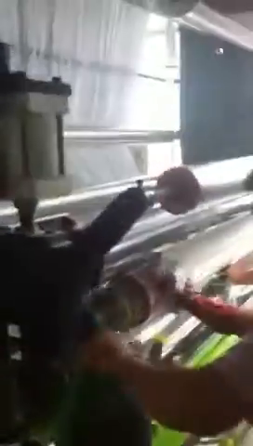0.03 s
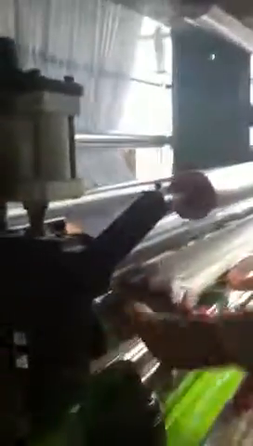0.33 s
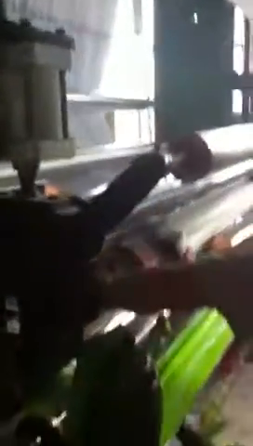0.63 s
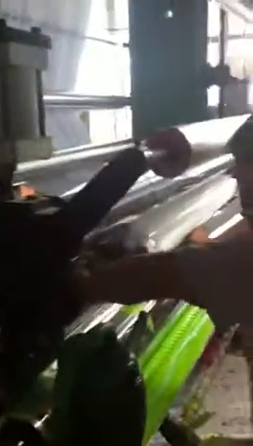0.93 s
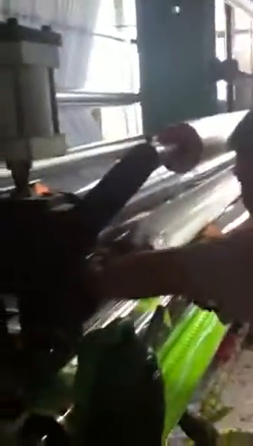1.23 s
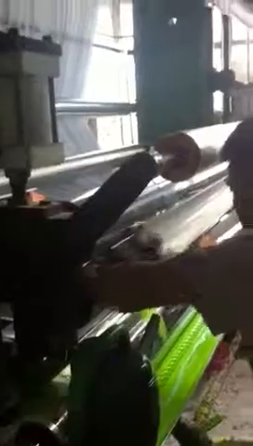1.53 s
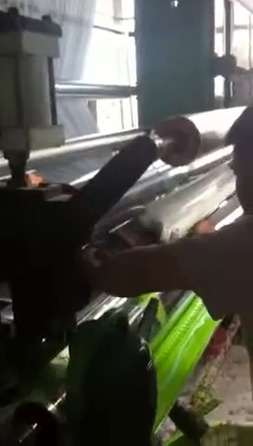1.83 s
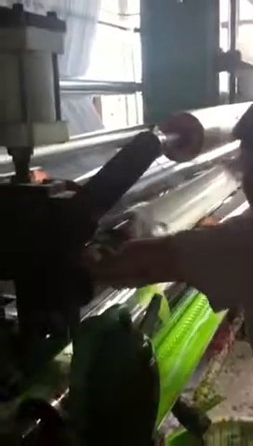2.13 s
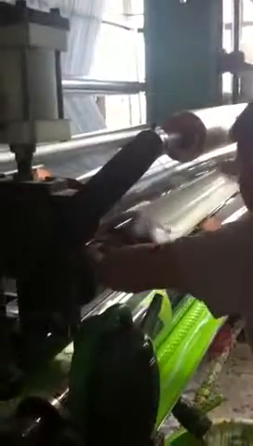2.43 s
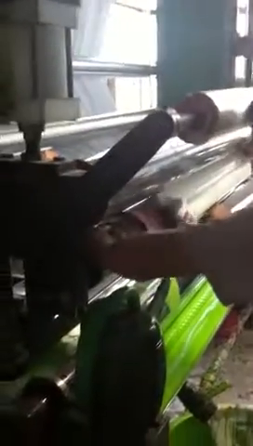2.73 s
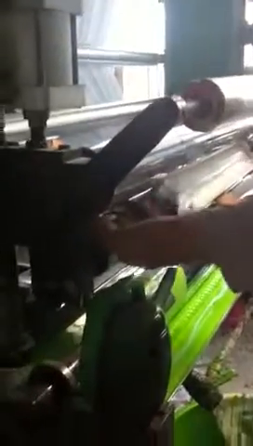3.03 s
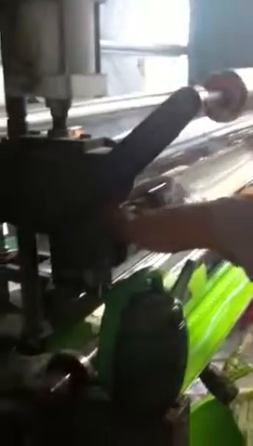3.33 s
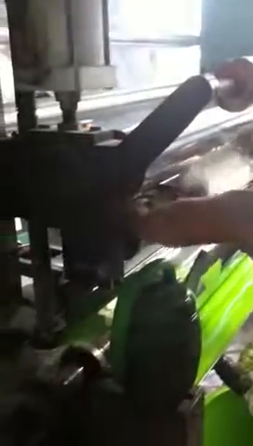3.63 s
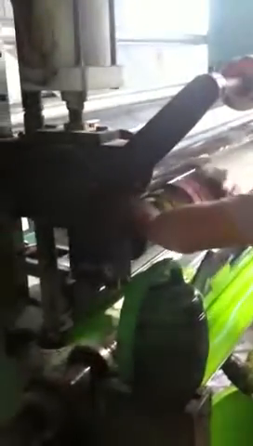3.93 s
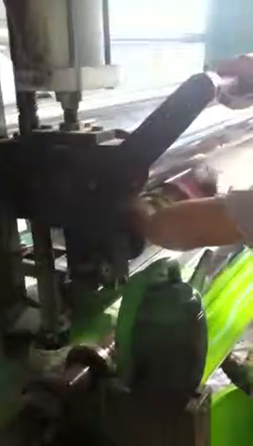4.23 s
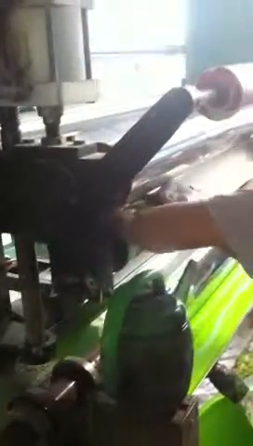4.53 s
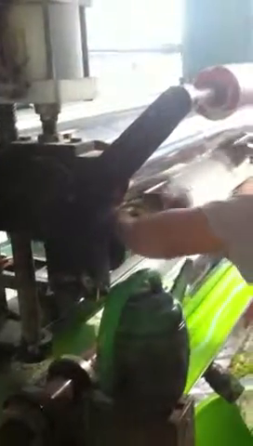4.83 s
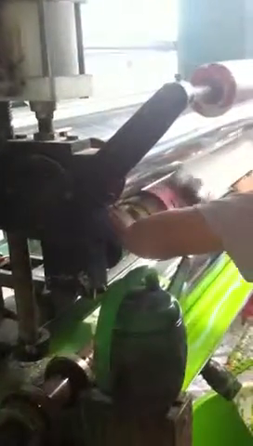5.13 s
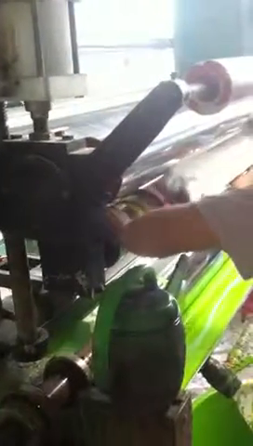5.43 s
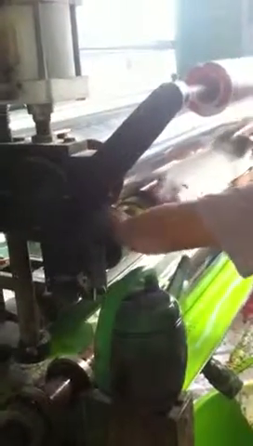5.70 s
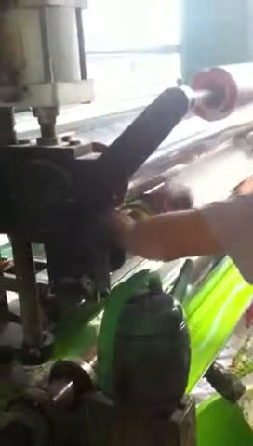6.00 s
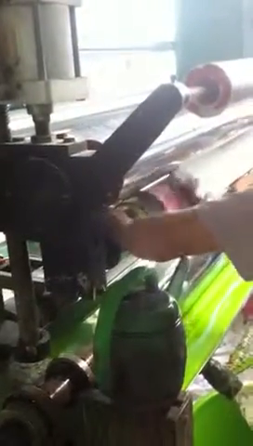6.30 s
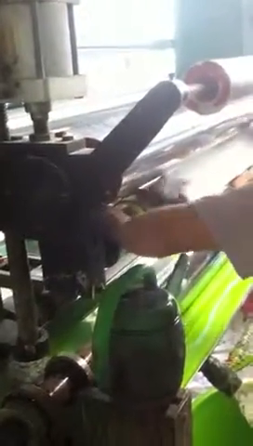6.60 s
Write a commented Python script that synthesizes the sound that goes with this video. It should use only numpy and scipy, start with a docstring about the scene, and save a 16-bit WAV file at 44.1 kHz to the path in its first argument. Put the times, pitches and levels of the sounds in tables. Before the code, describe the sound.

Factory machinery rumbles continuously while a pad pressed on a turning metal roll squeals in shrill, fluttering surges.

```python
"""In a factory hall, a hand presses a pad against a spinning metal roll of a film-converting machine.
Stick-slip friction excites three close modes of the roll, which beat against one another in a squeal
that sags in pitch with the pressure and surges as the pad grabs.
Under it the machinery rumbles, the running film hisses and the drive hums."""
import sys
import numpy as np
from scipy import signal
from scipy.fft import rfft, irfft, next_fast_len
from scipy.io import wavfile

SR = 44100
rng = np.random.default_rng(int(sys.argv[2]) if len(sys.argv) > 2 else 0)


def to_wav(s):
    """Save 16-bit WAV."""
    ch = np.atleast_2d(s).T  # columns
    pcm = np.round(np.clip(ch, -1, 1) * 32767)  # PCM
    wavfile.write(sys.argv[1], SR, pcm.astype(np.int16))


N = 298116
TIME = np.arange(N) / SR

# Spectra of the machinery and the film. Each row: frequency in Hz, relative spectral density in dB.
RUMBLE_SPECTRUM = [(20, -44), (55, -32), (100, -15.5), (130, -3.5), (215, -1.5), (300, -0.5), (390, -4.5),
                   (570, -4), (700, -8), (1250, -11), (2000, -14), (3200, -18.5), (5000, -28.5),
                   (16000, -28.5)]
HISS_SPECTRUM = [(500, -3), (3000, -11), (4300, 1), (5600, -4), (8000, -4.5), (11500, -4), (14000, 0),
                 (16000, 1)]
# Tones of the drive. Each row: frequency in Hz, level in dB.
DRIVE_TONES = [(81.9, -56), (163.5, -48), (212, -46.5), (299.8, -45), (415.5, -62), (583, -50),
               (588.5, -45.5), (830.5, -53.5), (901, -56), (1387, -63)]
# First touches of the pad. Each row: centre in seconds, pitch in Hz, level in dB, half-width in seconds.
TOUCH_CHIRPS = [(0.276, 2100, -34.5, 0.01), (0.902, 2280, -35, 0.017), (0.97, 2300, -41, 0.021),
                (1.235, 2050, -40, 0.028)]
# The hardest grabs of the pad. Each row: centre in seconds, crest of the friction gain in dB.
PAD_GRABS = [(1.024, 2), (1.107, 2), (1.342, 6.5), (1.501, 3), (1.664, 4), (1.751, 7), (1.841, 6),
             (1.926, 5), (2.003, 6.5), (2.239, 7), (2.321, 4.5), (2.715, 2.5), (2.872, 4.5), (3.523, 4.5),
             (3.678, 9), (3.903, 4.5), (4.129, 8.5), (4.239, 8), (4.964, 5), (5.575, 4.5), (5.63, 4),
             (5.853, 5), (6.041, 5), (6.47, 10), (6.561, 11.5), (6.647, 8.5)]
# Losses of grip. Each row: moment of the catch in seconds, dip before it in dB, dip length in seconds.
PAD_SLIPS = [(1.328, -8, 0.034), (1.608, -12, .018), (1.993, -6, .035), (2.051, -3, 0.014),
             (2.132, -6, .02), (2.21, -10, 0.021), (2.311, -7, .012), (2.634, -14, .014), (3.17, -6, 0.055),
             (4.193, -5, .02), (4.286, -7, .02), (4.559, -4, .015), (4.643, -2, .015), (5.221, -4, 0.019),
             (5.533, -7, .02), (5.893, -11, 0.011), (6.625, -7, 0.032)]
# How hard the pad bites. Each row: time in seconds, roughness from 0 to 1, overtone lift in dB.
PAD_BITE = [(1, .6, 1), (1.7, .3, 1), (2.6, 0.49, 1.5), (3.2, 0.42, 0.5), (3.8, 1, 0), (5.3, 0.97, 3),
            (6.2, .62, 4), (6.7, 0.42, 5)]
# How hard the hand presses. Each row: time in seconds, pressure from 0 to 1.
HAND_PRESSURE = [(1, 0), (1.25, .45), (1.65, 0.53), (2, .77), (2.8, 0.99), (5.5, .97), (6.1, .75),
                 (6.5, 0.25), (6.76, 0.08)]
# The clear mode. Each row: time in seconds, level in dB before the friction gain.
CLEAR_LEVEL = [(.97, -50), (1.02, -23.5), (1.25, -25), (1.42, -33), (1.58, -24), (1.66, -19), (2.08, -21.5),
               (2.4, -16), (2.7, -18.5), (3.45, -18.5), (3.75, -25), (4.3, -21), (4.9, -22), (5.55, -19.5),
               (5.8, -24), (6.22, -21.5), (6.36, -30.5), (6.76, -39)]
# The upper mode. Each row: time in seconds, offset from CLEAR_LEVEL in dB.
UPPER_OFFSET = [(1.05, -32), (1.22, -0.5), (1.5, 3.5), (1.7, -1.5), (3.4, -4), (3.8, 1.5), (5, -7.5),
                (5.35, -4.5), (5.9, -12.5), (6.76, -11)]
# Roll resonances that radiate the overtones. Each holds: centre in Hz, bandwidth in Hz, gain in dB.
SECOND_RESONANCE = (4380, 240, -33.5)
THIRD_RESONANCE = (6540, 250, -29)


def undb(db):
    """Amplitude grows tenfold for every 20 dB."""
    return 10 ** (np.asarray(db) / 20)


def unit(x):
    """Normalisation brings the rms to 1."""
    return x / np.sqrt(np.mean(np.abs(x) ** 2))


def curve(table, column=1):
    """Linear interpolation joins a table's points in time."""
    points = np.transpose(table)
    return np.interp(TIME, points[0], points[column])


def bump(centre_s, half_width_s):
    """A Gaussian pulse falls from 1 to 1/e at its half-width."""
    return np.exp(-((TIME - centre_s) / half_width_s) ** 2)


def wander(hz):
    """Low-pass filtering of noise gives a smooth fluctuation of rms 1, up to about hz."""
    size = next_fast_len(N)
    f = np.arange(size // 2 + 1) * SR / size
    spectrum = rfft(rng.standard_normal(size)) * np.exp(-.5 * (f / hz) ** 2)
    return unit(irfft(spectrum, size)[:N])


def resonate(x, hz, width_hz, db):
    """A two-pole resonance favours the band around its centre."""
    return undb(db) * signal.lfilter(*signal.iirpeak(hz, hz / width_hz, fs=SR), x)


def restless_noise(colour, flicker_db, flicker_hz, octaves=9):
    """Independent amplitude modulation makes each octave of a coloured noise flicker."""
    size = next_fast_len(N)
    f = np.maximum(np.arange(size // 2 + 1) * SR / size, 1)
    hz, db = np.transpose(colour)
    spectrum = rfft(rng.standard_normal(size)) * undb(np.interp(np.log(f), np.log(hz), db))
    octave = np.clip(np.floor(np.log2(SR / 2 / f)), 0, octaves - 1)
    bands = (irfft(spectrum * (octave == k), size)[:N] for k in range(octaves))
    return unit(sum(band * undb(flicker_db * wander(flicker_hz)) for band in bands))


def machinery_rumble():
    """Random vibration of the machinery gives broadband noise, strongest at low frequencies."""
    return undb(-30) * restless_noise(RUMBLE_SPECTRUM, flicker_db=0.55, flicker_hz=18)


def film_hiss():
    """The running film radiates broadband noise that reaches far into the treble."""
    return undb(-39) * restless_noise(HISS_SPECTRUM, flicker_db=1.04, flicker_hz=11)


def drive_hum(drift_hz=1.376, waver_db=2.0):
    """Periodic motion of motor and gears gives a line spectrum that wavers with the load."""
    hum = np.zeros(N)
    for hz, db in DRIVE_TONES:
        amplitude = np.sqrt(2) * undb(db + waver_db * wander(8.3))
        phase = 2 * np.pi * np.cumsum(hz + drift_hz * wander(5.16)) / SR
        hum += amplitude * np.sin(phase)
    return hum


def touch_chirps():
    """Transient excitation: the pad catches for a moment and a mode rings briefly."""
    return sum(np.sqrt(2) * undb(db) * bump(s, half_width_s) * np.sin(2 * np.pi * hz * TIME)
               for s, hz, db, half_width_s in TOUCH_CHIRPS)


def slip(catch_s, dip_db, dip_s, snap_s=.002, rebound_db=3, rebound_s=.014):
    """Friction lets go and catches: the level in dB sinks, snaps back and overshoots."""
    caught = .5 + .5 * np.tanh((TIME - catch_s) / snap_s)
    return (1 - caught) * dip_db * bump(catch_s, dip_s) + caught * rebound_db * bump(catch_s, rebound_s)


def friction_gain(surge_hz=18, scatter=0.24, surge_db=2, grab_s=0.018, slack_delay_s=0.034):
    """Unsteady friction modulates the amplitude by chatter, grabs with a slack behind them, and slips."""
    cycles = np.cumsum(surge_hz * (1 + scatter * wander(3.1))) / SR
    held = np.minimum(sum(bump(s, 1 / surge_hz) for s, _ in PAD_GRABS), 1)
    chatter = surge_db * np.cos(2 * np.pi * cycles) * (1 - held)  # a grab overrides the chatter
    grabs = sum(db * (bump(s, grab_s) - 1.18 * bump(s + slack_delay_s, half_width_s=0.0073))
                for s, db in PAD_GRABS)
    slips = sum(slip(*row) for row in PAD_SLIPS)
    return undb(chatter + grabs + slips)


def lower_mode_db(awake_s=4.036, rise_s=0.24, crest_s=4.9, fade_db_per_s=3):
    """The lower mode wakes late, swells to a crest and decays exponentially, outlasting the others."""
    rise_db = np.interp(TIME, [awake_s - rise_s, awake_s, crest_s], [-55, -29.5, -24.5])
    return rise_db - fade_db_per_s * np.maximum(TIME - crest_s, 0)


def mode(pitch_hz, db, roughness, jitter_hz, jitter_rate_hz, rasp, spread_hz):
    """Self-excited oscillation, as a phasor: a harder bite adds pitch jitter and rasp."""
    phase = 2 * np.pi * np.cumsum(pitch_hz + roughness * jitter_hz * wander(jitter_rate_hz)) / SR
    # uneven slips shake amplitude and phase, broadening the spectral line
    blur = rasp * roughness ** 1.2
    shake = unit(wander(spread_hz) + 1j * wander(spread_hz))
    swing = (1 + blur * shake) / np.sqrt(1 + blur ** 2)
    # friction cannot feed an ever larger swing, so its peaks are rounded
    swing = unit(swing / np.sqrt(1 + 0.034 * np.abs(swing) ** 2))
    started = TIME >= CLEAR_LEVEL[0][0]
    return swing * np.exp(1j * phase) * undb(db) * started


def roll_squeal(clear_sag_hz=124, upper_sag_hz=115, lower_sag_hz=8, waver_hz=4.03):
    """Stick-slip drives three close modes, which beat and fall in pitch as the pad loads the roll."""
    friction = friction_gain()
    pressure, clear_db = curve(HAND_PRESSURE), curve(CLEAR_LEVEL)
    upper_db = clear_db + curve(UPPER_OFFSET)
    roughness, lift_db = np.clip(curve(PAD_BITE), 0, 1), curve(PAD_BITE, 2)
    clear = friction * mode(2299.5 - clear_sag_hz * pressure, clear_db, roughness,
                            jitter_hz=7.3, jitter_rate_hz=25.7, rasp=0.92, spread_hz=31.3)
    upper = friction ** 0.4 * mode(2375.7 - upper_sag_hz * pressure, upper_db, roughness,
                                   jitter_hz=24.15, jitter_rate_hz=46.4, rasp=3.4, spread_hz=51)
    lower = friction ** 0.5 * mode(2100 - lower_sag_hz * pressure, lower_mode_db(), roughness,
                                   jitter_hz=18.3, jitter_rate_hz=37, rasp=3.8, spread_hz=57)
    # the shifting contact makes all pitches waver together
    waver = np.exp(2j * np.pi * np.cumsum(waver_hz * wander(7)) / SR)
    motion = (clear + upper + lower) * waver
    # stick-slip squares off the motion: the third harmonic leads, the second grows with the bite
    phasor = np.exp(1j * np.angle(motion))
    second = roughness * resonate(np.real(motion * phasor), *SECOND_RESONANCE)
    third = resonate(np.real(motion * phasor * phasor), *THIRD_RESONANCE)
    return np.real(motion) + undb(lift_db) * (second + third)


def scene():
    """By superposition, the running machine and the squealing roll add in one channel."""
    return (machinery_rumble() + film_hiss() + roll_squeal() + touch_chirps() + drive_hum())[None]


def record(dry, bass_hz=45, top_hz=15750):
    """Band-limiting thins the deepest bass and cuts the highest treble."""
    thinned = signal.sosfilt(signal.butter(2, bass_hz, "highpass", fs=SR, output="sos"), dry)
    return signal.sosfilt(signal.ellip(12, .1, 80, top_hz, fs=SR, output="sos"), thinned)


dry = scene()
out = record(dry)
to_wav(out)
```